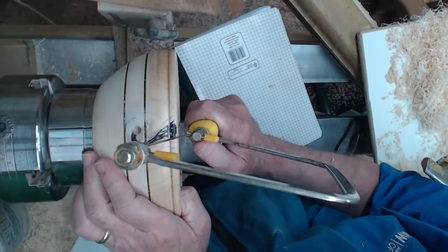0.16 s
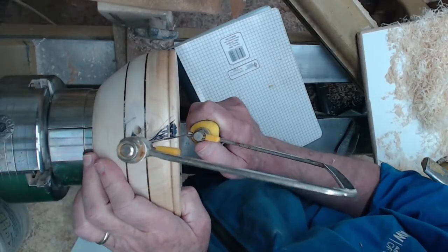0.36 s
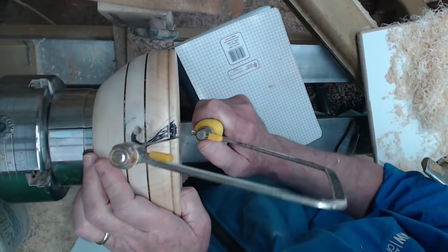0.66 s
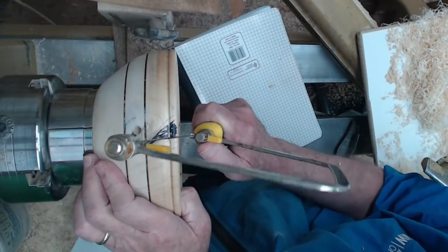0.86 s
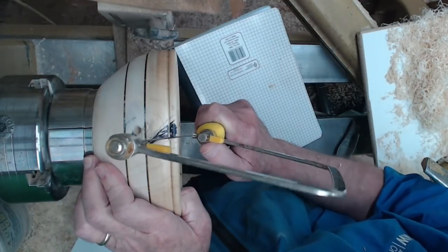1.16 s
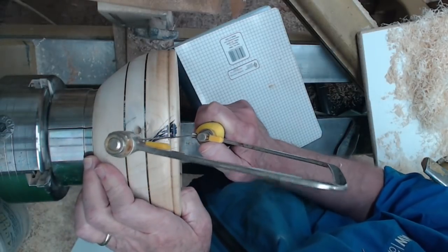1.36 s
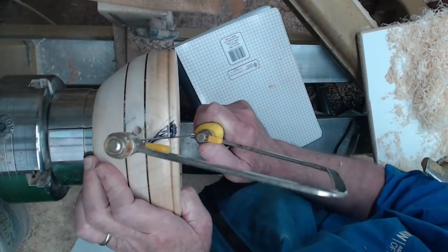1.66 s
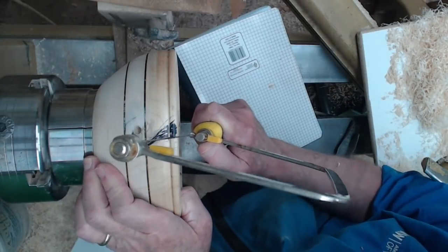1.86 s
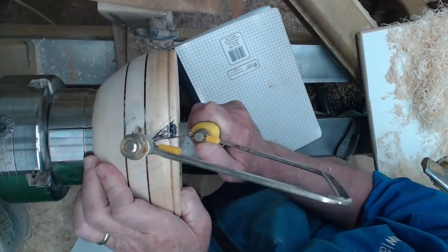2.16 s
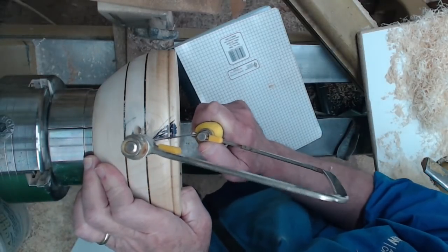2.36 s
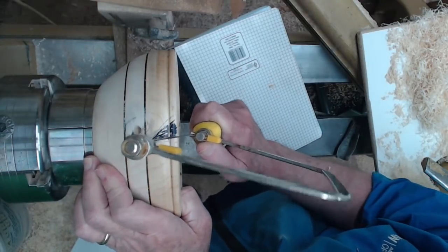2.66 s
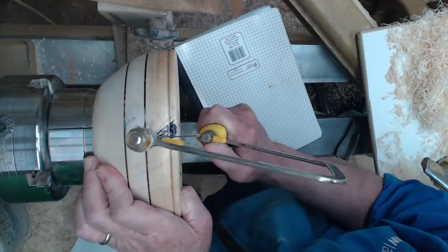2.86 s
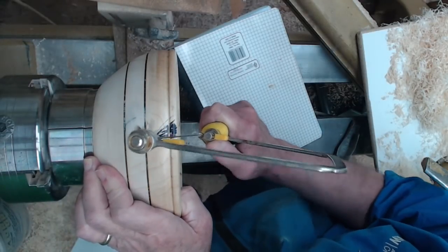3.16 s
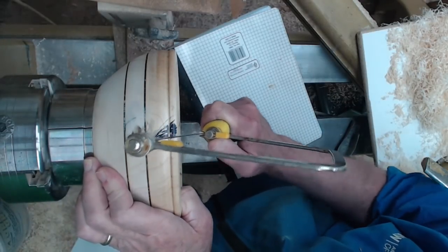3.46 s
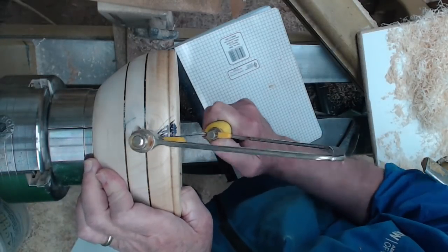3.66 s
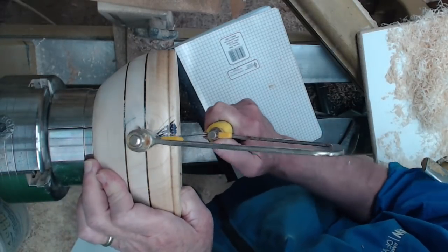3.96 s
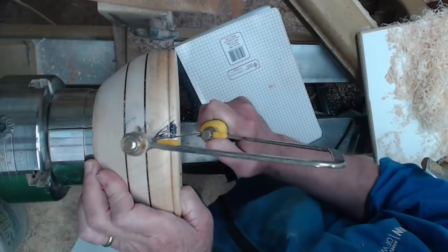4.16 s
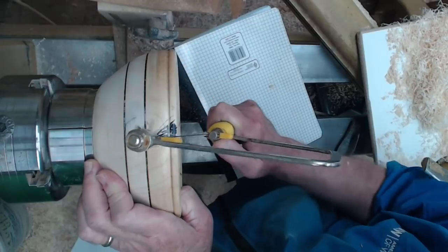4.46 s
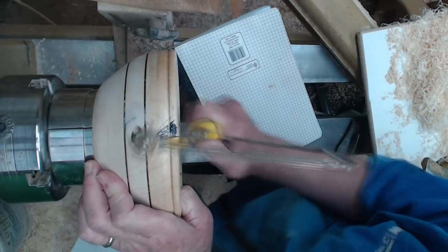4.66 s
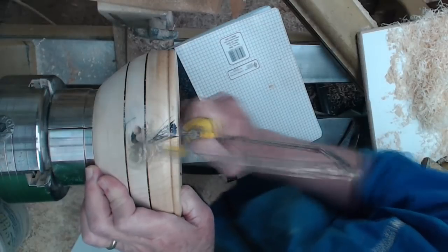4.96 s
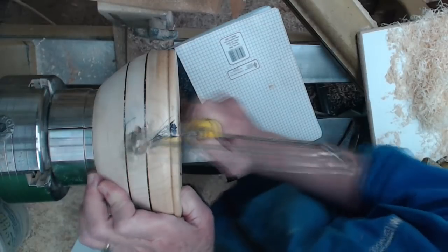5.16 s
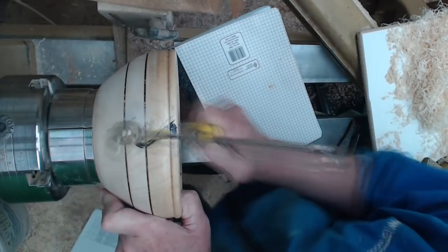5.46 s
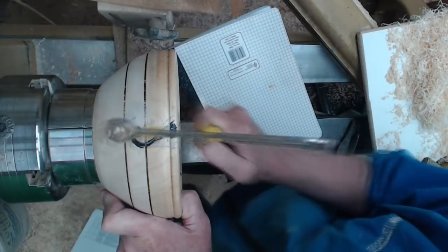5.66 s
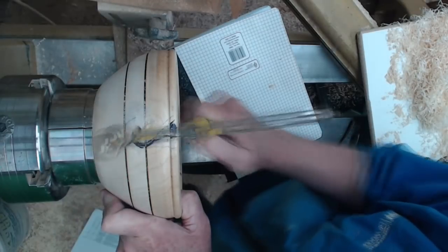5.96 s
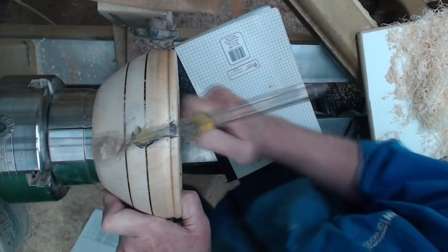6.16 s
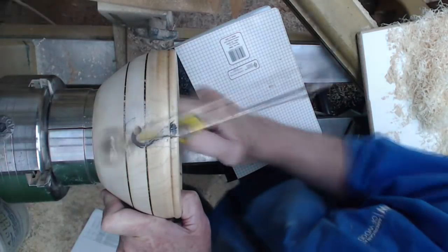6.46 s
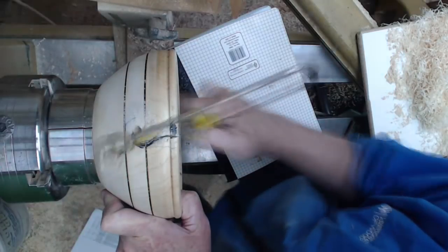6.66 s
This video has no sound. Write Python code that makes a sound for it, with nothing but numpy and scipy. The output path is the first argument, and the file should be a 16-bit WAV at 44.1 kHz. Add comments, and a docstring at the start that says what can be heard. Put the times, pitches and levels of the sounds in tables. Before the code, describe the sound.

A small hand saw scrapes through a thin hollow wooden bowl, hesitant short strokes first, then steady slow ones, then very rapid sawing.

```python
"""A quiet workshop, airy noise and a wavering hum, is heard first; then a coping saw cuts a thin wooden bowl
held on a lathe, in slow strokes and later very quick ones. Random tooth bites excite the resonances
of bowl, blade and lathe bed; sparse clicks make the lone ticks, jolts and dull hand knocks.
Once a palm slides over the wood as swelling band-passed noise. Two close ports hear it with a short room."""
import sys
import numpy as np
from scipy import signal
from scipy.fft import rfft, irfft, next_fast_len
from scipy.io import wavfile

SR = 44100
rng = np.random.default_rng(int(sys.argv[2]) if len(sys.argv) > 2 else 0)


def file_out(sig):
    """Save sig as 16-bit WAV at sys.argv[1]."""
    # one column per channel
    cols = np.atleast_2d(sig).T
    # limit, then scale
    lim = np.clip(cols, -1, 1)
    pcm = np.round(lim * 32767).astype(np.int16)
    wavfile.write(sys.argv[1], SR, pcm)


N = 299880
T = np.arange(N) / SR

# Levels of the room air and the hum. Each row: time in seconds, air in dB, hum in dB.
WORKSHOP = [(0, -63, -61), (.4, -61, -67.5), (.9, -62.5, -75), (2, -58, -70), (6.8, -58.5, -72)]
# Relative spectrum of the air. Each row: frequency in Hz, density in dB per Hz.
AIR = [(20, -19), (50, -22.5), (120, -14.5), (350, -21), (700, -27), (1500, -28.5), (3700, -38),
       (7800, -46)]
# Correlation of the air between the ports. Each row: frequency in Hz, left-right likeness from 0 to 1.
AIR_LIKENESS = [(60, 0.89), (1000, 0.72), (2000, .05)]
HUM_HZ = 59.5

# Slow cutting strokes, with a few short nudges. Each row: full speed in seconds, length in seconds, bite in dB.
SLOW_CUTS = [(0.267, 0.036, -51), (0.314, 0.069, -36), (0.602, 0.064, -36.5), (0.892, 0.046, -42),
             (0.928, 0.042, -36.5), (1.426, 0.075, -45.5), (1.494, 0.023, -57), (1.584, 0.035, -34),
             (2.08, 0.016, -42), (2.187, 0.071, -23.5), (2.458, 0.066, -26), (2.674, 0.037, -57),
             (2.784, 0.095, -27.5), (3.094, 0.099, -27.5), (3.386, 0.081, -22.5), (3.659, 0.095, -23),
             (3.926, 0.075, -22), (4.196, 0.088, -22), (4.455, 0.079, -22.5)]
# Slow back strokes, teeth dragging. Each row: full speed in seconds, length in seconds, bite in dB.
SLOW_BACKS = [(0.159, 0.12, -64.5), (0.775, 0.081, -47), (2.021, 0.086, -42), (2.29, 0.056, -54.5),
              (2.606, 0.12, -37), (2.912, 0.11, -34.5), (3.221, 0.11, -34.5), (3.504, 0.11, -33),
              (3.779, 0.11, -33), (4.045, 0.11, -31), (4.314, 0.11, -33), (4.553, 0.06, -34)]
# Quick cutting strokes. Each row: full speed in seconds, bite in dB.
QUICK_CUTS = [(4.606, -30), (4.676, -31.5), (4.742, -32.5), (4.804, -33), (4.871, -27.5), (4.936, -30),
              (4.996, -26.5), (5.054, -25.5), (5.115, -28), (5.177, -26.5), (5.235, -27.5), (5.293, -28.5),
              (5.352, -27), (5.414, -28.5), (5.475, -27), (5.534, -26.5), (5.594, -27), (5.656, -30.5),
              (5.714, -28.5), (5.776, -28.5), (5.832, -32), (5.888, -32), (5.947, -30.5), (6.008, -31),
              (6.064, -33), (6.123, -32), (6.184, -36.5), (6.245, -35), (6.314, -35.5), (6.373, -34),
              (6.429, -31.5), (6.491, -31.5), (6.552, -30.5), (6.608, -32.5), (6.673, -31), (6.736, -33),
              (6.793, -37.5)]
# Bite of the return stroke after each quick cut, read between rows. Each row: time in seconds, bite in dB.
RETURNS = [(4.6, -40), (5.3, -38.5), (6.25, -40.5), (6.8, -38.5)]
QUICK_LENGTH_S, RETURN_LAG_S, RETURN_HALF_S = 0.028, 0.024, 0.02
# share of a stroke spent speeding up
CUT_RISE_SHARE, BACK_RISE_SHARE, QUICK_RISE_SHARE = 0.58, 0.53, 0.66
# low shake and blade rasp relative to the bite
CUT_SHAKE_DB, BACK_SHAKE_DB, QUICK_SHAKE_DB = -9, -12.5, -11.5
RETURN_SHAKE_DB, RETURN_RASP_DB = -13, -8
# rasp at a middling bite, and the share of the bite's dB swing that it follows
RASP_DB, RASP_AT_BITE_DB, RASP_FOLLOWS = -38, -29, 0.74
# fall of bite, shake and rasp away from full speed: dB lost at the stroke's ends, powers before and after
EDGE_DB, CATCH_POWER, RELEASE_POWER = [13, 7.5, 15.5], [2.9, 4.7, 2.18], [2.8, 1.4, 2.6]

# Resonances of the bowl. Each row: frequency in Hz, width in Hz, relative level in dB.
BOWL = [(371, 67, -22), (540, 135, -24.5), (662.4, 37, -10.5), (804, 19, -11), (871, 61.3, -9),
        (933.2, 47.7, -1), (1001.5, 69, -8.5), (1076, 86.5, -17), (1235, 32, -22.5), (1740.3, 63, -12),
        (1890, 156, -22), (2173, 200, -32)]
# Resonances of the lathe bed; the first is the mode a jolt sets swaying. Each row: frequency in Hz, width in
# Hz, relative level in dB.
LATHE_BED = [(124, 12.5, -18), (75, 2.4, -17.5), (187.6, 46, -12), (221, 6, -2), (240.5, 17.3, -2),
             (287.6, 44, -10.5)]
# Resonances of the blade; the first four are the lower group. Each row: frequency in Hz, width in Hz,
# relative level in dB.
BLADE = [(2990, 83.4, -4.5), (3214, 390, -19), (3570, 97, -9), (3610, 500, -19.5), (4480, 550, -12),
         (5650, 650, -14), (5990, 420, -9), (7600, 610, -16), (7630, 480, -20.5)]
# The slot deepens. Each row: time in seconds, dB gained by the upper bowl modes, by the top blade modes,
# by the slot ring.
KERF = [(1.6, -1.5, 0, -11), (2.6, -1, -0.5, -6), (4.5, -1, 2.5, -6), (5.4, 2.5, -3.5, 2)]
# A single tooth lets go. Each row: time in seconds, click in dB.
TICKS = [(.262, -25.5), (1.57, -29), (2.08, -35)]
# The blade catches and the lathe bed sways. Each row: time in seconds, peak of the sway in dB.
JOLTS = [(.325, -59), (.62, -59), (.94, -47.5), (1.46, -55), (1.595, -44.5), (2.09, -50.5)]
MODE_WANDER_DB, WANDER_PER_S = 2.0, 4.66  # the blade meets the wall at new spots, so each mode's share wanders
BED_BASS_CUT_HZ = 97  # the small bites barely move the heavy bed below this
JOLT_THUMP_DB = 22  # click that a jolt gives to all bed modes, relative to its sway
BLADE_RING_DB = -13.5  # drive of the lower blade modes, relative to the bite
SLOT_RING_DB = -8.5  # relative to the rasp, before the slot deepens or not
FRAME_DB = -7.5  # rasp radiated by the saw frame, relative to the blade

# Small dull knocks from the hands. Each row: time in seconds, frequency in Hz, click in dB.
KNOCKS = [(1.196, 334, -30.5), (1.33, 560, -38)]
KNOCK_WIDTH_HZ = 60

# the palm's one slide: full speed, rise and fall; the hiss peaks later and is narrower
PALM_S, PALM_RISE_S, PALM_FALL_S = 1.848, 0.09, 0.084
PALM_RUB_DB, PALM_HISS_DB, PALM_RUMBLE_DB = -46.5, -49, -55.5
HISS_LAG_S, HISS_WIDTH_SHARE = 0.016, 0.96

# Phase of the left port ahead of the right. Each row: frequency in Hz, lead in radians.
LEFT_LEAD = [(300, 0), (1120, -.4), (1460, 1.6), (1750, 1.1), (3190, 1.2), (4500, 2.9), (5100, 2.4),
             (8100, 3.6)]
# Level of the left port over the right. Each row: frequency in Hz, difference in dB.
LEFT_LOUDER = [(310, 0), (910, -2.8), (2680, 0), (4610, 1), (7940, 2.5)]
ROOM_T60_S, ROOM_DB, WALL_CUT_HZ = 0.32, -5.5, 2900  # the bass decay time is halved at WALL_CUT_HZ
CUTOFF_HZ = 8600


def amp(db):
    """Decibels are logarithmic: 20 dB is a tenfold amplitude."""
    return 10 ** (np.asarray(db) / 20)


def rms_one(x):
    """Normalisation: signal scaled to unit effective value."""
    return x / np.sqrt(np.mean(x ** 2) + 1e-20)


def in_time(rows):
    """Linear interpolation: each column of a curve, sample by sample, held beyond its ends."""
    s, *columns = np.transpose(rows)
    return [np.interp(T, s, column) for column in columns]


def at_hz(points, hz):
    """Logarithmic frequency axis: a spectrum is read between its points in proportion to pitch."""
    p = np.array(points, float)
    return np.interp(np.log(hz + 1), np.log(p[:, 0] + 1), p[:, 1])


def drift(rate):
    """Low-passed chance: white noise through two equal poles at rate Hz wanders slowly with spread 1."""
    r = np.exp(-2 * np.pi * rate / SR)
    wander = signal.lfilter([1], [1, -2 * r, r * r], rng.standard_normal(N + SR))
    return rms_one(wander[SR:])  # the filter has settled after a second


def workshop():
    """Partial coherence: air noise is more alike left and right in the bass; a wavering sine is the hum."""
    air_db, hum_db = in_time(WORKSHOP)
    hz = np.fft.rfftfreq(N, 1 / SR)
    alike = np.clip(at_hz(AIR_LIKENESS, hz), -1, 1)
    mid, side = rfft(rng.standard_normal((2, N)))
    ports = np.sqrt(1 + alike) * mid + np.sqrt(1 - alike) * side * [[1], [-1]]
    air = irfft(amp(at_hz(AIR, hz)) * ports, N)
    hum = np.sqrt(2) * np.sin(2 * np.pi * HUM_HZ * T) * amp(3.9 * drift(8.5))
    return amp(air_db) * rms_one(air) + amp(hum_db) * hum


def stroke_force():
    """Force follows blade speed: bite, shake and rasp grow as a stroke speeds up and fall as it slows."""
    strokes = [(s, length, db, CUT_RISE_SHARE, CUT_SHAKE_DB) for s, length, db in SLOW_CUTS]
    strokes += [(s, length, db, BACK_RISE_SHARE, BACK_SHAKE_DB) for s, length, db in SLOW_BACKS]
    strokes += [(s, QUICK_LENGTH_S, db, QUICK_RISE_SHARE, QUICK_SHAKE_DB) for s, db in QUICK_CUTS]
    rows = []
    for s, length, db, share, shake_db in strokes:
        rasp_db = RASP_DB + RASP_FOLLOWS * (db - RASP_AT_BITE_DB)
        rows.append((s, length * share, length * (1 - share), db, db + shake_db, rasp_db))

    returns_db, = in_time(RETURNS)
    for s, _ in QUICK_CUTS:
        db = returns_db[round(s * SR)]
        rows.append((s + RETURN_LAG_S, RETURN_HALF_S, RETURN_HALF_S,
                     db, db + RETURN_SHAKE_DB, db + RETURN_RASP_DB))

    power = np.zeros((3, N))
    for s, rise, fall, *levels_db in rows:
        near = slice(max(round((s - .2) * SR), 0), round((s + .2) * SR))
        before = T[near] < s
        away = (T[near] - s) / np.where(before, -rise, fall)
        steepness = np.where(before, np.c_[CATCH_POWER], np.c_[RELEASE_POWER])
        shape_db = -np.c_[EDGE_DB] * away ** steepness
        power[:, near] += amp(shape_db + np.array(levels_db)[:, None]) ** 2
    return np.sqrt(power)


def teeth(slow_per_s, spread_db, slow_grab_db):
    """Stick-slip as random impulses: a slow blade grabs in clumps, a quick one bites denser and more evenly."""
    sizes = amp(spread_db * np.minimum(rng.exponential(1, N), 4)) * rng.choice([-1, 1], N)
    quick = T > RETURNS[0][0]
    per_s = slow_per_s * np.where(quick, 2.5, 1)
    grab_db = slow_grab_db * np.where(quick, .4, 1)
    bites = sizes * (rng.random(N) < per_s / SR) * amp(grab_db * drift(83))
    return np.where(quick, bites / np.std(bites[quick]), bites / np.std(bites[~quick]))


def clicks(events):
    """Impulsive excitation: one single-sample click for each time in seconds and level in dB."""
    out = np.zeros(N)
    out[[round(s * SR) for s, db in events]] = amp(np.array(events)[:, 1])
    return out


def body(force, modes, lift_db=0, above_hz=0, wander_db=0):
    """Modal superposition: parallel resonators of alternating sign; unit white force gives about unit rms
    when no mode is lifted or wanders."""
    out, power = 0, 0
    for k, (hz, width, level_db) in enumerate(modes):
        r = np.exp(-np.pi * width / SR)
        b = (-1) ** k * amp(level_db) * (1 - r * r) / 2 * np.array([1, 0, -1])
        a = [1, -2 * r * np.cos(2 * np.pi * hz / SR), r * r]
        gain_db = lift_db * (hz > above_hz)
        if wander_db:
            gain_db = gain_db + wander_db * drift(WANDER_PER_S)
        out = out + signal.lfilter(b, a, force * amp(gain_db) + 1e-18)
        power += amp(level_db) ** 2 * (1 - r * r) / 2
    return out / np.sqrt(power)


def sway():
    """Cascaded resonance: the heavy bed takes up a jolt slowly, so its swaying mode swells, then dies."""
    swaying = LATHE_BED[:1]
    unit_peak = np.abs(body(body(clicks([(0, 0.0067)]), swaying), swaying)).max()
    return body(body(clicks(JOLTS), swaying), swaying) / unit_peak


def saw():
    """Forced vibration: bites ring wood, bed and blade at the cut; noise under the rasp rings the frame."""
    bite, shake, rasp = stroke_force()
    bowl_db, top_db, slot_db = in_time(KERF)
    coarse = teeth(slow_per_s=2500, spread_db=2.0, slow_grab_db=2.0)
    fine = teeth(slow_per_s=5900, spread_db=4.0, slow_grab_db=2.5)
    ticks = clicks(TICKS)

    wood = body(bite * coarse + ticks, BOWL, bowl_db, above_hz=1500, wander_db=MODE_WANDER_DB)

    bed = body(shake * coarse + ticks + amp(JOLT_THUMP_DB) * clicks(JOLTS), LATHE_BED)
    bass_cut = signal.butter(2, BED_BASS_CUT_HZ, "high", fs=SR, output="sos")
    bed = signal.sosfilt(bass_cut, bed) + sway()

    low_drive = amp(BLADE_RING_DB + np.minimum(bowl_db, 0)) * bite * fine
    blade_low = body(low_drive + ticks, BLADE[:4], wander_db=MODE_WANDER_DB)
    blade_top = body(rasp * fine + ticks, BLADE[4:], top_db, above_hz=5400, wander_db=MODE_WANDER_DB)
    slot_drive = amp(SLOT_RING_DB + slot_db) * rasp * rng.standard_normal(N)
    slot_ring = body(slot_drive, [(5680, 220, 0)])  # Hz, width Hz, dB

    frame = amp(FRAME_DB) * body(rasp * rng.standard_normal(N), BLADE, top_db, above_hz=6700)
    return wood + bed + blade_low + blade_top + slot_ring, frame


def knocks():
    """Free damped vibration: each knock rings one mode."""
    return sum(body(clicks([(s, db)]), [(hz, KNOCK_WIDTH_HZ, 0)]) for s, hz, db in KNOCKS)


def band(x, low_hz, high_hz):
    """Band-pass selection: only one frequency range remains, at unit rms."""
    return rms_one(signal.sosfilt(signal.butter(2, [low_hz, high_hz], "band", fs=SR, output="sos"), x))


def swell(s, rise, fall):
    """Gaussian envelope: level in dB falls as the square of the time from full speed."""
    return -12 * ((T - s) / np.where(T < s, rise, fall)) ** 2


def palm():
    """Sliding friction: skin on wood makes smooth noise, with a late hiss and a rumble in the lathe bed."""
    slide_db = swell(PALM_S, PALM_RISE_S, PALM_FALL_S)
    hiss_db = swell(PALM_S + HISS_LAG_S, HISS_WIDTH_SHARE * PALM_RISE_S, HISS_WIDTH_SHARE * PALM_FALL_S)
    white = rng.standard_normal((3, N))
    rub = amp(PALM_RUB_DB + slide_db) * band(white[0], 480, 1900)
    hiss = amp(PALM_HISS_DB + hiss_db) * band(white[1], 2200, 6400)
    rumble = amp(PALM_RUMBLE_DB + slide_db) * band(white[2], 130, 200)
    return rub + hiss + rumble


def ports_and_room(x):
    """Interaural-like cues and reverberation: each port has its phase and shading; eight wall loops a side."""
    size = next_fast_len(N + SR)
    hz = np.fft.rfftfreq(size, 1 / SR)
    # the left port takes half of each difference, the right port the inverse
    half = amp(at_hz(LEFT_LOUDER, hz) / 2) * np.exp(.5j * at_hz(LEFT_LEAD, hz))
    response = np.array([half, 1 / half])
    t60 = ROOM_T60_S / (1 + hz / WALL_CUT_HZ)
    # the small bowl radiates its bass poorly into the far room
    far_bass = (hz / (hz + 900)) ** 2
    for k, lag in enumerate(rng.uniform(0.016, .04, 16)):
        loop = amp(-60 * lag / t60) * np.exp(-2j * np.pi * hz * lag)
        echoes = loop / (1 - loop)  # a geometric series of returns
        response[k % 2] += amp(ROOM_DB) * (-1) ** (k // 2) * echoes * far_bass
    return irfft(rfft(x, size) * response, size)[:, :N]


def scene():
    """Linear superposition: workshop, saw, knocks and palm add; frame and workshop bypass the room."""
    cut, frame = saw()
    return workshop() + ports_and_room(cut + knocks() + palm()) + frame


def record(dry):
    """Band limiting: the treble rolls off, the top is cut, and a trace of converter hiss stays."""
    soft = signal.sosfilt(signal.butter(6, 7600, fs=SR, output="sos"), dry)
    cut = signal.sosfilt(signal.cheby2(12, 50, CUTOFF_HZ, fs=SR, output="sos"), soft)
    return cut + amp(-103) * rng.standard_normal(dry.shape)


dry = scene()
out = record(dry)
file_out(out)
```